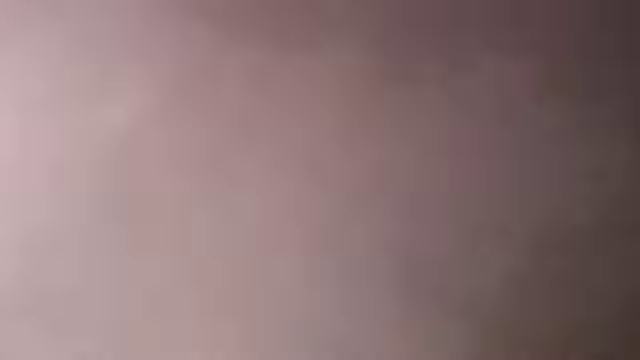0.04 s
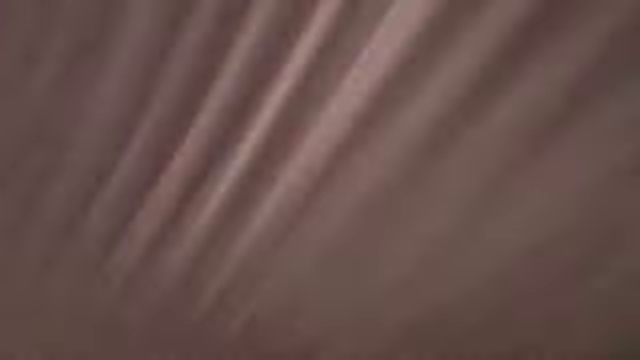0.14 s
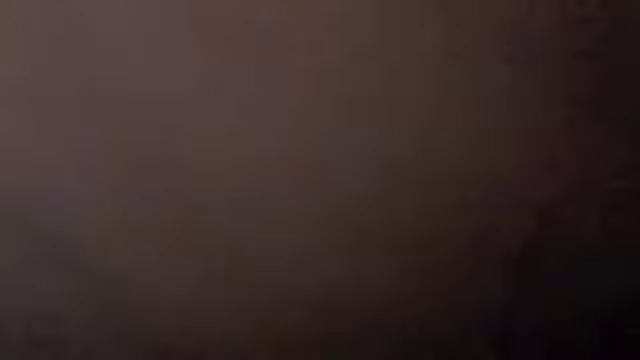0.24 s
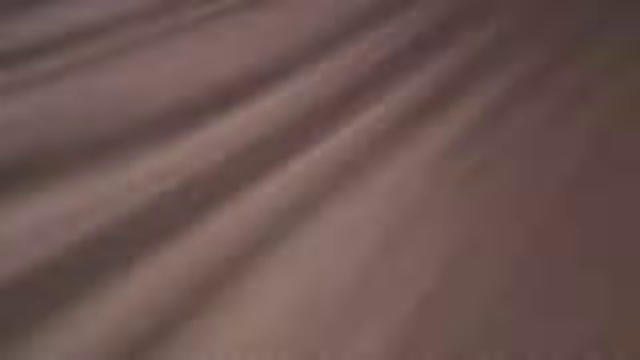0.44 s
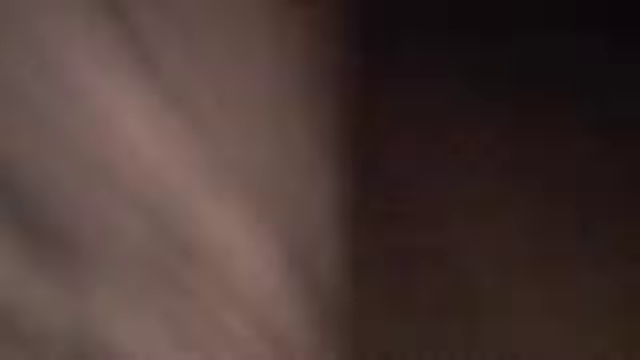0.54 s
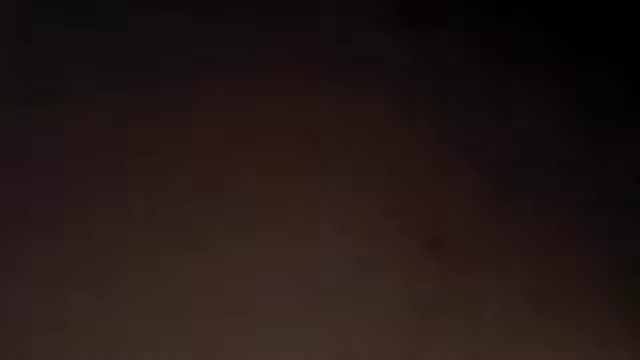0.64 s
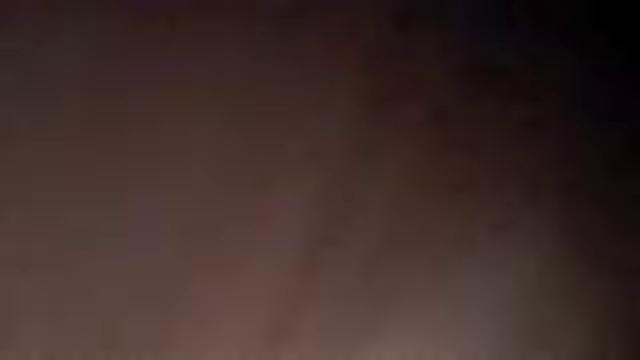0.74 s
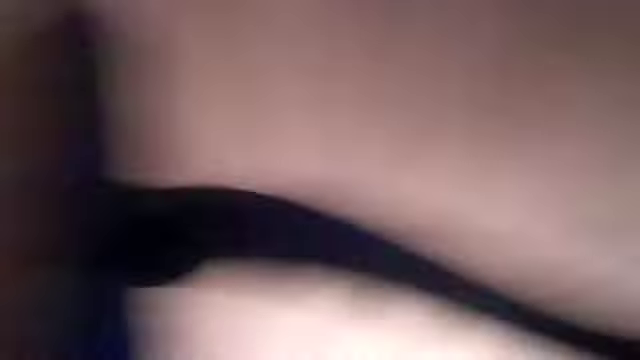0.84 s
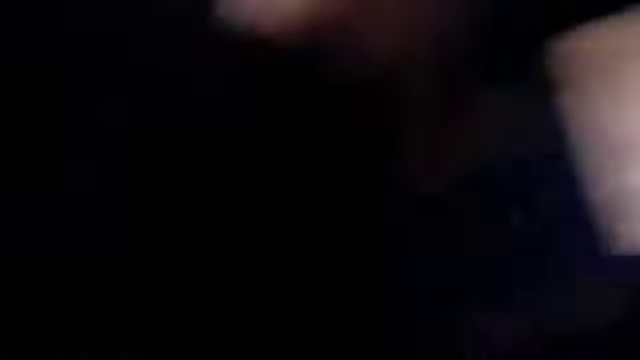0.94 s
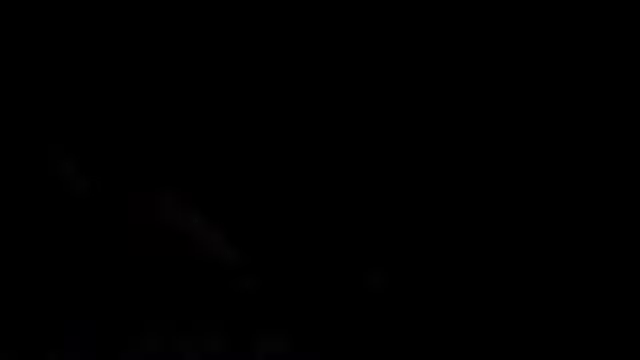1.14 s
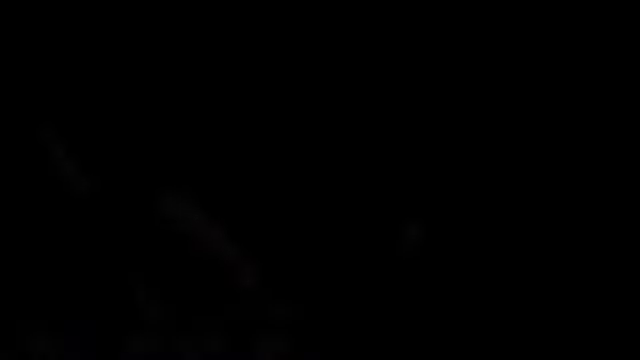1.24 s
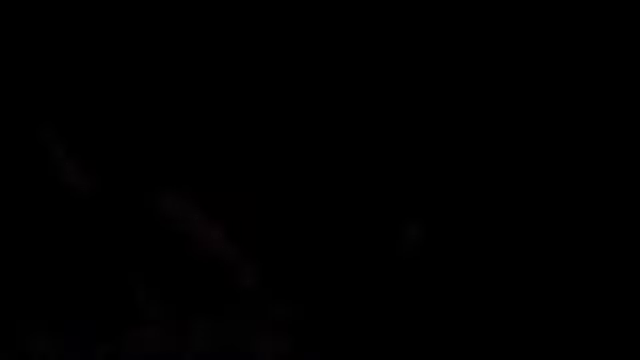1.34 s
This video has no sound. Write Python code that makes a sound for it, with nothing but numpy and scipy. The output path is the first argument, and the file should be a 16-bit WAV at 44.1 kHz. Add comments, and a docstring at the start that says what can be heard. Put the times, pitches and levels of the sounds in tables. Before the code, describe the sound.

A stiff hat bumps a small handheld camera right at the microphone: faint ticks, then a loud crunchy cluster of thumps and plastic rattles, scattered knocks, cloth rubbing, a tiny squeak and last clack, then faint hiss.

```python
"""A stiff hat knocks and scrapes on a small handheld camera, right at its two microphone ports.
Each contact is three streams of random grains: thumps of the air at the ports, rattle of the
plastic case as ringing modes, and crackle. Cloth rubs as dense coloured grains, squeaks once as
stick-slip partials, and small parts ring after two blows. Close reflections follow the contacts;
hiss and two faint tones lie beneath. Loud peaks overload the recorder."""
import sys
import numpy as np
from scipy import signal
from scipy.fft import rfft, irfft
from scipy.io import wavfile
from scipy.ndimage import uniform_filter1d

SR = 44100
rng = np.random.default_rng(int(sys.argv[2]) if len(sys.argv) > 2 else 0)


def store_wav(level_fs):
    """Save 16-bit WAV to argv[1]."""
    pcm = np.round(np.clip(np.atleast_2d(level_fs), -1, 1) * 32767)
    wavfile.write(sys.argv[1], SR, pcm.T.astype(np.int16))


N = 61739

# Hat contacts: start t/s, length t/s, thump level/dB, thump f/Hz, rattle level/dB, rattle focus f/Hz,
# rattle tilt/(dB per octave), crackle level/dB, thump left-right/dB, rattle and crackle left-right/dB
CONTACTS = [(0.008, 0.0059, -31, 211, -34.5, 450, 11, -31.0, -1, -0.5),
            (0.022, 0.0024, -35.5, 165, -32.5, 2750, 21, -43, -3, 18),
            (0.032, 0.0033, -33, 270, -51, 454, -2, -40, -22, 1),
            (0.036, 0.009, -38, 149, -39, 445, -12, -65, -9, -16),
            (0.05, 0.0034, -32.0, 388, -42, 567, -5, -57, -12, -2),
            (0.055, 0.0013, -31.5, 384, -45, 490, 1, -58, -17, 4),
            (0.062, 0.0016, -29.5, 386, -36.5, 450.0, -10, -42, 5, -2),
            (0.073, 0.0021, -38, 250.0, -35.5, 570.0, 6, -46, -4, 26),
            (0.089, 0.006, -37.5, 267, -46.0, 450.0, -3.0, -58, 20.0, -2),
            (0.101, 0.0033, -38, 220.0, -42, 450.0, -7, -50, 12.0, -5),
            (0.2149, 0.01, -16, 65, -15, 460, -4, -8, 5.5, 0.0),
            (0.223, 0.014, -18, 247, -18, 2200, 4.0, -14, 1, 6),
            (0.2337, 0.026, -18, 280, -9.5, 530, -1, -8.5, -3, 0),
            (0.258, 0.0043, -24.5, 78.5, -18.0, 1260, 8, -9.5, -2, 13),
            (0.3232, 0.0022, -35.5, 408, -15, 1370, 0, -15.0, -11, 9.5),
            (0.3314, 0.00051, -20, 257, -24.5, 570.0, -4, -24, -1, 18),
            (0.3411, 0.0078, -33, 392, -16.0, 565, 3, -14.5, 30, 6.5),
            (0.3499, 0.0011, -20.5, 370, -15.5, 630.0, -2.0, -17, 7, 9.5),
            (0.354, 0.01, -28, 380.0, -25.5, 990, -3, -24.0, 20, 5),
            (0.4345, 0.0038, -25, 375, -17.0, 460, 1.5, -13, 3, 2),
            (0.442, 0.0019, -22, 366, -14, 1450.0, 7.5, -21.5, 19, 11),
            (0.448, 0.0043, -32.0, 373, -22.5, 770.0, -4, -32, 15, 5),
            (0.523, 0.0014, -35.5, 235, -49, 520.0, -4, -66, 4, 15),
            (0.5355, 0.011, -28, 366, -22.0, 466, -0.5, -28, 11, 3),
            (0.549, 0.007, -30, 162, -32, 500.0, -1.0, -32, -9, 5),
            (0.559, 0.002, -28, 295, -34, 980.0, 5, -38, -8, 1),
            (0.5996, 0.0013, -16, 113.4, -12.5, 467, -3, -18.0, 9.5, 5.5),
            (0.601, 0.0043, -20.5, 126, -22.5, 500.0, -4.5, -21.5, 8.5, 1),
            (0.6094, 0.00087, -17.5, 223, -24.5, 500.0, -12.5, -28, 9, -2),
            (0.615, 0.0052, -29.5, 360.0, -29, 470.0, -7, -35, 19, 3),
            (0.631, 0.0128, -29.0, 382, -25.5, 576, 1.5, -30.5, 3, 3.0),
            (0.661, 0.012, -40.5, 345, -31.5, 1150, 3, -25.0, 1, -1.5),
            (0.716, 0.0059, -62, 318, -47, 600.0, 4, -52.5, -4, 1.5),
            (0.841, 0.0035, -46.0, 160.0, -35, 1130.0, 14, -41.5, -3, 3),
            (0.868, 0.0056, -30, 390, -24, 2700, 8, -35, 31, 11),
            (0.875, 0.0041, -30, 333, -23, 596, -1.0, -35.5, -2, 11),
            (0.889, 0.002, -37.5, 140.0, -40, 700.0, -8, -32, 6, 4),
            (0.904, 0.0047, -43, 148, -31, 2860.0, 2.0, -46, 20, 13),
            (0.929, 0.0011, -49, 110.0, -36, 3000.0, 22, -36, 6.0, 12),
            (0.963, 0.015, -57, 380.0, -47, 700.0, -10, -56.0, 10, -10),
            (0.992, 0.0082, -34.5, 370, -18.5, 484, -1.5, -22.5, -11, -0.5),
            (1.046, 0.0024, -14.5, 238, -17.5, 2280, -1, -15, 27, 4),
            (1.061, 0.003, -35, 263, -38, 500.0, -7, -38, 13, 3),
            (1.074, 0.0061, -36, 222, -43, 553, -6, -37, 19, 1),
            (1.084, 0.012, -42, 352, -33, 630.0, -12, -47, 9, 1),
            (1.118, 0.0087, -52, 380.0, -33, 750, -4.0, -46, 10, 3.5),
            (1.1474, 0.0021, -36, 208, -19.5, 930, -5, -15.5, 9, 9.5),
            (1.15, 0.003, -31, 211, -23, 1100, -7.5, -28.5, 6, -5),
            (1.157, 0.0033, -34, 222, -43, 3000.0, 13, -25.5, 22, 4),
            (1.191, 0.0041, -52.0, 256, -47.5, 1144, -3, -49, 15, 8.5),
            (1.199, 0.0077, -48, 244.7, -47, 1670.0, 4.0, -45.5, 16.0, 7)]
# Plastic case modes: f/Hz, relative level/dB, t60/s
CASE_MODES = [(435.7, -5.5, .017), (546, -2, 0.02054), (637.6, -4, 0.02), (778, 0, 0.019), (983, -3, 0.018),
              (1155, -0.5, 0.018), (1328, -4.5, 0.017), (1505, 1.5, .014), (1785, 2.5, .012),
              (2100, 2, .012), (2355, -2, .012), (2706, 3, .01), (3120, -7, 0.011)]
# Crackle and cloth fizz spectrum: f/Hz, level/dB
CRACKLE_SPECTRUM = [(1500, -17.5), (3000, -1), (4500, -1), (6500, -3.5), (9000, -3.5), (12000, -2),
                    (14000, -1), (14500, -14.5), (15300, -47)]
# Cloth sliding on the case: t/s, rumble level/dB, rustle level/dB, fizz level/dB, left-right/dB
RUB = [(0, -35, -40.5, -45, 22), (0.071, -46.5, -41, -50.5, 2), (.115, -41.5, -52, -65, 9),
       (0.138, -44.5, -69, -69, 13), (0.201, -68, -73, -72, -11), (.27, -42, -38, -48, 3),
       (.32, -50, -51.5, -55.5, 20), (0.371, -44.5, -37.5, -36.5, 8), (0.431, -57, -55.5, -65, 5.5),
       (0.462, -37, -29.5, -34.5, 6.5), (.53, -62, -57, -71, 2), (.56, -35, -33.5, -48.5, 8),
       (.65, -48, -39, -42, 7), (.69, -47, -53, -49, 2), (0.759, -65, -60.5, -67.5, 3),
       (.83, -73.5, -56, -46, 1), (0.879, -63, -32, -40, -8), (0.941, -59, -49, -47, 5),
       (0.956, -57, -52, -65, 10), (1.0, -44, -49.5, -50.5, 0.5), (1.07, -40.5, -42, -26, 5.5),
       (1.11, -46.5, -39.5, -49.5, 6.5), (1.14, -49, -40.5, -50.5, -1), (1.17, -54, -64, -62, 12),
       (1.24, -65, -55.5, -59, 9), (1.26, -75, -81, -87, 11), (1.4, -74.5, -76.5, -73, -1.5)]
# Cloth rumble spectrum: f/Hz, level/dB
RUMBLE_SPECTRUM = [(25, -21), (60, -2), (150, -4), (300, -1), (450, -11), (900, -42)]
# Cloth rustle spectrum: f/Hz, level/dB
RUSTLE_SPECTRUM = [(200, -27.5), (450, -3.5), (900, -5.5), (1800, -11.5), (3000, -8), (4500, -16),
                   (7000, -48.5)]
# Squeak course: t/s, slip rate f/Hz, level/dB
SQUEAK = [(1.004, 293, -40), (1.014, 293, -29.5), (1.022, 288, -28.5), (1.033, 290, -28), (1.043, 282, -27),
          (1.048, 281, -45)]
# Squeak partials: multiple of the slip rate, relative level/dB
SQUEAK_ORDERS = [(1, -8), (2, -13.5), (3, -3), (4, -11), (5, -15), (6, -6.5), (7, -17), (8, -14.5),
                 (9, -15.5), (10, -14), (11, -16.5)]
# Small metal part: f/Hz, level/dB, t60/s
METAL_RING = [(2210, -31, .2), (3350, -41, .12), (3795, -37, .14)]
# Case humming on after a late knock: f/Hz, level/dB, t60/s
CASE_RING = [(228, -30, .2)]
# Decay of reflections and case after-ring: f/Hz, t60/s
TAIL_DECAY = [(200, 0.04), (1000, 0.072), (4000, 0.074), (14000, 0.052)]
# Microphone noise spectrum: f/Hz, relative level/(dB per Hz)
HISS_SPECTRUM = [(18, -39), (30, -9.5), (59, -4.5), (164, -7), (347, -12.5), (427, -9.5), (485, -13),
                 (1170, -13.5), (1670, -20.5), (14200, -16.5)]
# Faint steady tones: f/Hz, level/dB
HUMS = [(425, -79.5), (1200, -79)]

PUSHES_PER_S, TAPS_PER_S, SNAPS_PER_S = 130, 2500, 8700
GRAIN_DB, RUB_GRAIN_DB = 3.5, 4  # mean of the exponential spread of grain sizes
RUMBLE_GRAINS_PER_S, RUSTLE_GRAINS_PER_S, FIZZ_GRAINS_PER_S = 750, 3000, 15000
THUMP_SAME, CASE_SAME, CRACKLE_SAME = 0.3, 0.69, 0.14  # left-right likeness, 0 to 1
PORT_LAG_SAMPLES = 6  # shared grains reach the right port later

# a contact bites at once, eases over its length, lets go
RISE_S, SAG_DB, RELEASE_S = 0.0007, -4.5, 0.0012
CLUMP_DB = 3.5  # pressure stutter, about every millisecond
THUMP_CYCLES, THUMP_LONGEST_S = 7.4, 0.039  # cycles to -60 dB; low thumps leak away sooner
DETUNE, STRIKE_DB = 0.04, 1.5  # each contact lands elsewhere: modes shift and change strength
FOCUS_DB, FOCUS_OCTAVES = 6.0, 0.45  # modes near the focus pitch stand out
CASE_CUT_HZ = 475  # the small case radiates little below

SQUEAK_WOBBLE, SQUEAK_ROUGH, SQUEAK_PAN_DB = 0.012, 0.33, 5
METAL_RING_S, CASE_RING_S, RING_PAN_DB = 0.258, 1.151, 3
TAIL_DB, HISS_DB = -11.5, -66.5
BASS_CUT_HZ, TREBLE_CUT_HZ, EDGE_HZ = 17, 14350, 15400
CEILING = 0.9


def amp(db):
    """Amplitude from dB."""
    return 10 ** (np.asarray(db, float) / 20)


def evened(x):
    """Scale to unit RMS."""
    return x / np.sqrt(np.mean(x ** 2) + 1e-20)


def smooth_noise(size, width):
    """Slow random wander of unit RMS; width in samples."""
    return evened(uniform_filter1d(rng.standard_normal(size), size=width))


def read(points, hz):
    """Interpolate a table over log frequency."""
    f, value = np.transpose(points)
    return np.interp(np.log(hz + 1), np.log(f + 1), value)


def sides(pan_db):
    """Left and right gains of constant power."""
    gains = amp(np.array([pan_db / 2, -pan_db / 2]))
    return gains / np.sqrt((gains ** 2).mean(0))


def highpass(x, order, hz):
    """Butterworth high-pass."""
    return signal.sosfilt(signal.butter(order, hz, "high", fs=SR, output="sos"), x)


def colour(spectrum):
    """Short minimum-phase filter with the given spectrum."""
    log_gain = np.log(amp(read(spectrum, abs(np.fft.fftfreq(4096, 1 / SR)))))
    response = np.exp(np.conj(signal.hilbert(log_gain)))
    return np.fft.ifft(response).real[:1024]


def ringing(modes):
    """Sum of exponentially dying sines, cut at 4096 samples."""
    t = np.arange(4096) / SR
    return sum(amp(db - 60 * t / t60) * np.sin(2 * np.pi * hz * t) for hz, db, t60 in modes)


def grains(size, per_s, spread_db, same):
    """Two partly shared trains of random clicks; the first sample always strikes."""
    hit = rng.random((3, size)) < per_s / SR
    hit[:, 0] = True
    sign = rng.choice([-1., 1.], (3, size))
    strength = amp(spread_db * np.minimum(rng.exponential(1, (3, size)), 4))
    clicks = hit * sign * strength
    delayed = np.pad(clicks[2], (PORT_LAG_SAMPLES, 0))[:size]
    shared = np.array([clicks[2], delayed])
    return np.sqrt(same) * shared + np.sqrt(1 - same) * clicks[:2]


def hiss():
    """Microphone noise, spectrally shaped, with two faint tones."""
    t = np.arange(N) / SR
    spectrum = rfft(rng.standard_normal((2, N)))
    noise = irfft(spectrum * amp(read(HISS_SPECTRUM, np.fft.rfftfreq(N, 1 / SR))), N)
    hums = sum(amp(db) * np.sin(2 * np.pi * hz * t) for hz, db in HUMS)
    return amp(HISS_DB) * evened(noise) + hums


def tail(x):
    """Close reflections and case after-ring: convolution with noise dying band by band."""
    hz, t, bands = signal.stft(rng.standard_normal((2, SR // 4)), SR, nperseg=128)
    decay = amp(-60 * t / read(TAIL_DECAY, hz)[:, None])
    response = signal.istft(bands * decay, SR, nperseg=128)[1]
    response = response / np.linalg.norm(response, axis=1, keepdims=True)
    return signal.fftconvolve(x, response, axes=1)[:, :N]


def rub():
    """Cloth fibres catch and slip: dense grains coloured as rumble, rustle and fizz."""
    s, rumble_db, rustle_db, fizz_db, pan_db = np.transpose(RUB)
    t, out = np.arange(N) / SR, 0
    for db, spectrum, per_s, same in (
            (rumble_db, RUMBLE_SPECTRUM, RUMBLE_GRAINS_PER_S, THUMP_SAME),
            (rustle_db, RUSTLE_SPECTRUM, RUSTLE_GRAINS_PER_S, CASE_SAME),
            (fizz_db, CRACKLE_SPECTRUM, FIZZ_GRAINS_PER_S, CRACKLE_SAME)):
        stream = grains(N, per_s, RUB_GRAIN_DB, same)
        layer = signal.fftconvolve(stream, colour(spectrum)[None], axes=1)[:, :N]
        out = out + amp(np.interp(t, s, db)) * evened(layer)
    return out * sides(np.interp(t, s, pan_db))


def squeak():
    """Brief stick-slip: wobbling harmonics, each fluttering on its own, the higher ones more."""
    s, hz, db = np.transpose(SQUEAK)
    t = np.arange(N) / SR
    slip_hz = np.interp(t, s, hz) * (1 + SQUEAK_WOBBLE * smooth_noise(N, 200))
    turns = np.cumsum(slip_hz) / SR
    tone = 0
    for k, order_db in SQUEAK_ORDERS:
        flutter = evened(uniform_filter1d(smooth_noise(N, 100), size=100))
        level = amp(order_db) * (1 + SQUEAK_ROUGH * np.sqrt(k / 3) * flutter)
        tone = tone + level * np.sin(2 * np.pi * (k * turns + rng.random()))
    envelope = amp(np.interp(t, s, db, -120, -120))
    return evened(tone) * envelope * sides(SQUEAK_PAN_DB)[:, None]


def ring():
    """Free decay of small parts after two of the blows."""
    out = np.zeros(N)
    for s, modes in ((METAL_RING_S, METAL_RING), (CASE_RING_S, CASE_RING)):
        out[round(s * SR):][:4096] = ringing(modes)
    return out * sides(RING_PAN_DB)[:, None]


def contact_pressure(t, length_s):
    """Pressing force: sags over the contact, then releases, stuttering throughout."""
    sag = amp(SAG_DB * np.minimum(t / length_s, 1))
    release = np.exp(-np.maximum(t - length_s, 0) / RELEASE_S)
    return sag * release * amp(CLUMP_DB * smooth_noise(len(t), 50))


def thump_response(hz):
    """Air pocket at the ports: one heavily damped mode."""
    t60_s = min(THUMP_CYCLES / hz, THUMP_LONGEST_S)
    return highpass(ringing([(hz, 0, t60_s)]), 2, 0.42 * hz)


def rattle_response(focus_hz, bright_db):
    """Case modes, weighted and detuned by where the blow lands."""
    modes = []
    for hz, db, t60 in CASE_MODES:
        tilt_db = bright_db * np.log2(hz / 1100)
        focus_db = FOCUS_DB * np.exp(-(np.log2(hz / focus_hz) / FOCUS_OCTAVES) ** 2)
        level_db = db + tilt_db + focus_db + STRIKE_DB * rng.standard_normal()
        modes.append((hz * (1 + DETUNE * rng.standard_normal()), level_db, t60))
    return highpass(ringing(modes), 3, CASE_CUT_HZ)


def contacts():
    """Hat blows: pressed grains excite the air pocket, the case and the crackle."""
    out, crackle, t = np.zeros((2, N + 8192)), colour(CRACKLE_SPECTRUM), np.arange(2048) / SR
    tap_rise = np.minimum(0.1 + t / RISE_S, 1)
    snap_rise = np.minimum(0.14 + t / RISE_S, 1)
    for (s, length_s, thump_db, thump_hz, case_db, focus_hz, bright_db, crackle_db,
         low_pan_db, high_pan_db) in CONTACTS:
        press = contact_pressure(t, length_s)
        thump = thump_response(thump_hz)
        rattle = rattle_response(focus_hz, bright_db)
        for per_s, same, db, pan_db, response, lag_s, rise in (
                (PUSHES_PER_S, THUMP_SAME, thump_db, low_pan_db, thump, 0.004, 1),
                (TAPS_PER_S, CASE_SAME, case_db, high_pan_db, rattle, 0.001, tap_rise),
                (SNAPS_PER_S, CRACKLE_SAME, crackle_db, high_pan_db, crackle, 0, snap_rise)):
            force = grains(len(t), per_s, GRAIN_DB, same) * press * rise
            part = signal.fftconvolve(force, response[None], axes=1)
            # unit RMS over the contact, plus the lag of the slower responses
            body = part[:, :round((length_s + lag_s) * SR)]
            part = part / np.sqrt((body ** 2).mean(1, keepdims=True) + 1e-20)
            out[:, round(s * SR):][:, :part.shape[1]] += amp(db) * sides(pan_db)[:, None] * part
    return out[:, :N]


def scene():
    """Contacts with their tail, over rub, squeak, rings and hiss."""
    hits = contacts()
    return hits + amp(TAIL_DB) * tail(hits) + rub() + squeak() + ring() + hiss()


def record(dry):
    """Microphones lose deep bass and top treble; each channel saturates firmly; then band limit."""
    thin = highpass(dry, 2, BASS_CUT_HZ)
    treble_cut = signal.firwin(127, TREBLE_CUT_HZ, window=("kaiser", 5), fs=SR)
    thin = signal.oaconvolve(thin, treble_cut[None], "same")
    clipped = thin / (1 + abs(thin / CEILING) ** 10) ** (1 / 10)
    band_limit = signal.firwin(511, EDGE_HZ, window=("kaiser", 9), fs=SR)
    return signal.oaconvolve(clipped, band_limit[None], "same")


dry = scene()
out = record(dry)
store_wav(out)
```